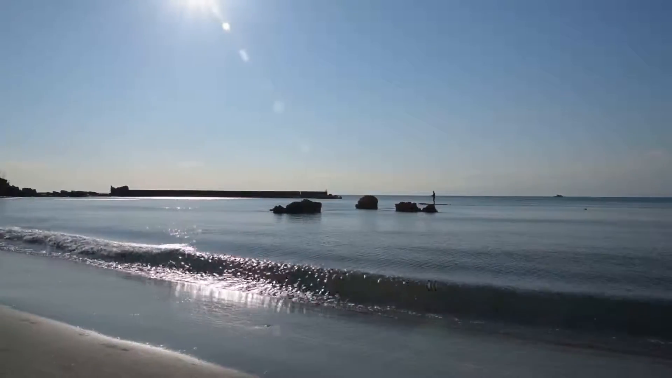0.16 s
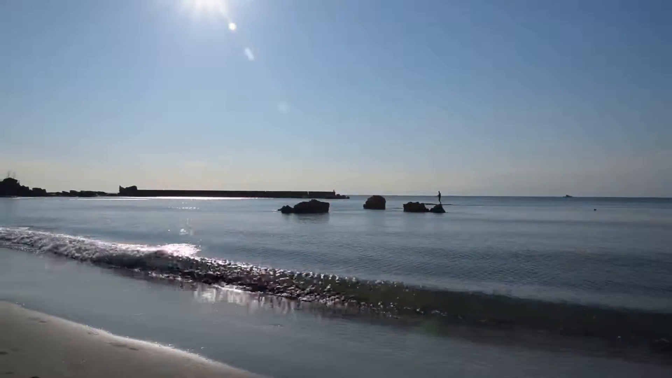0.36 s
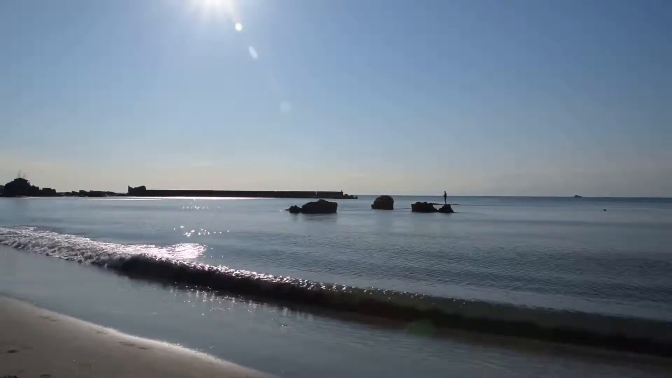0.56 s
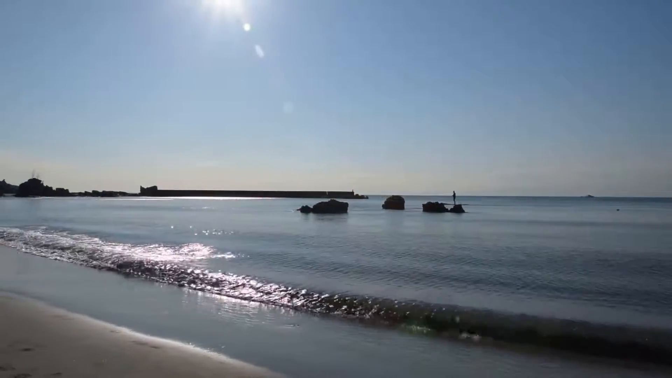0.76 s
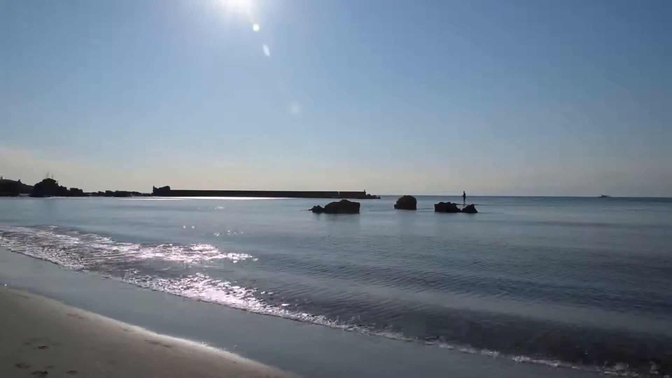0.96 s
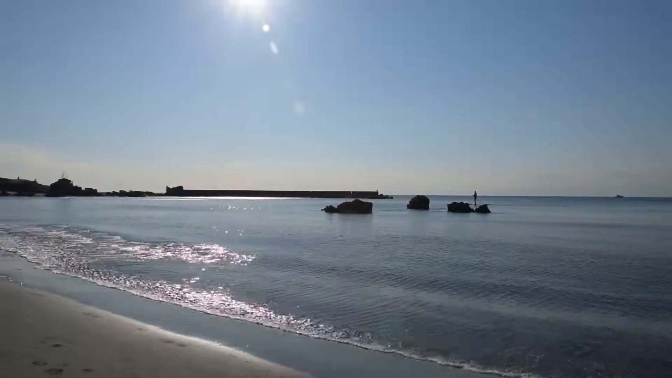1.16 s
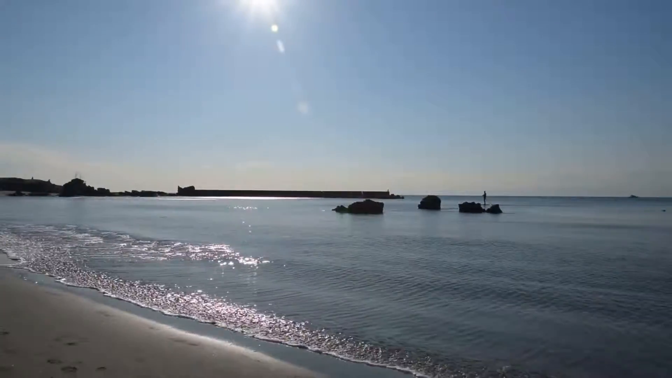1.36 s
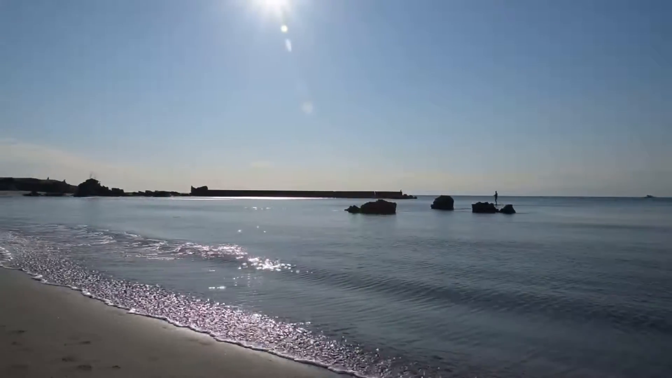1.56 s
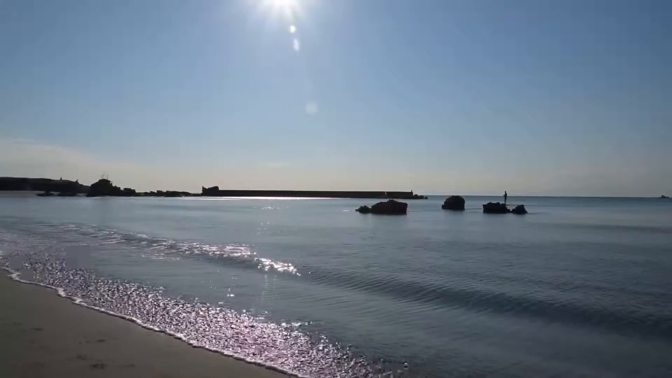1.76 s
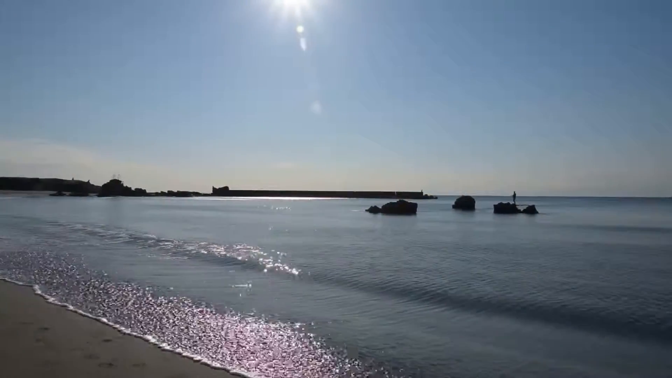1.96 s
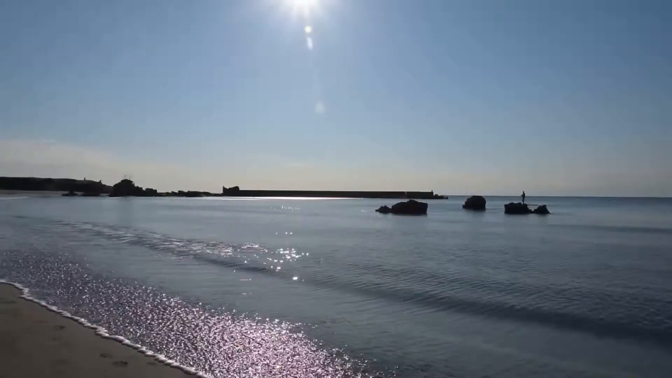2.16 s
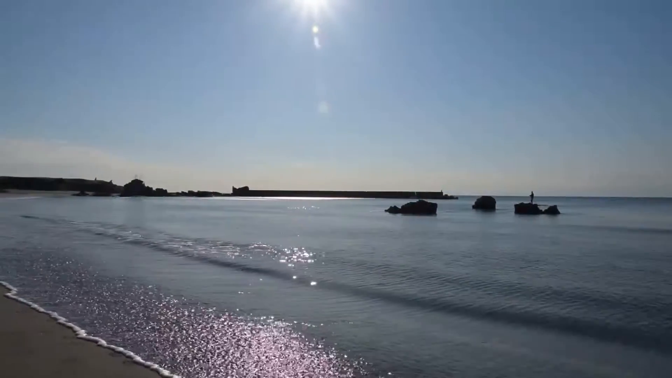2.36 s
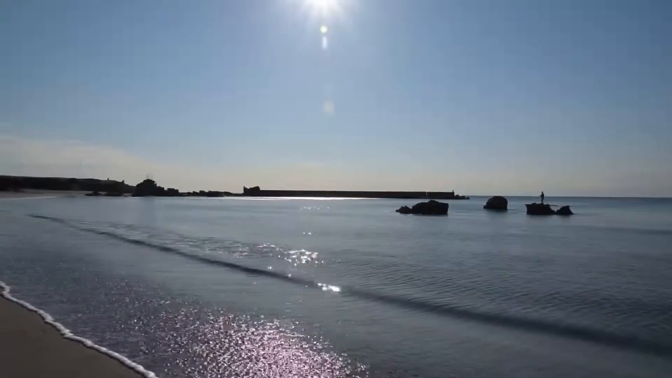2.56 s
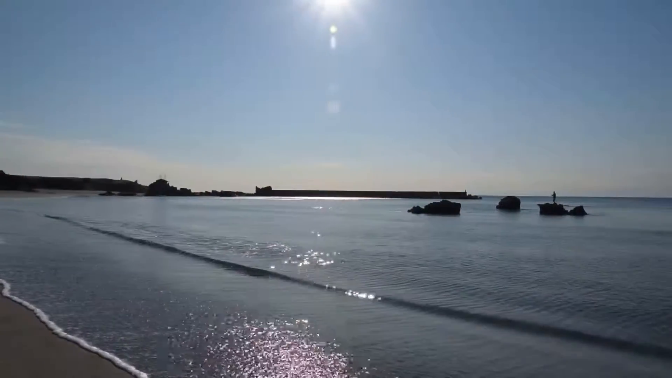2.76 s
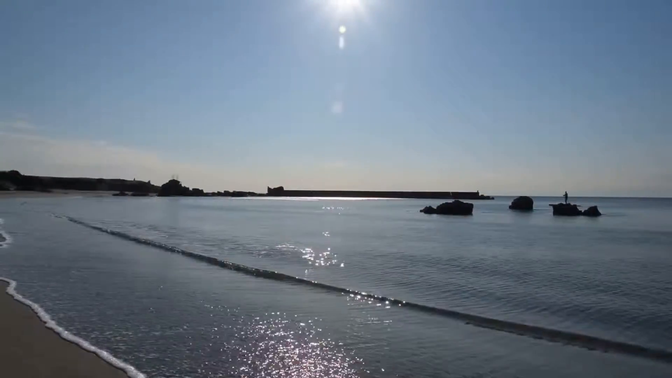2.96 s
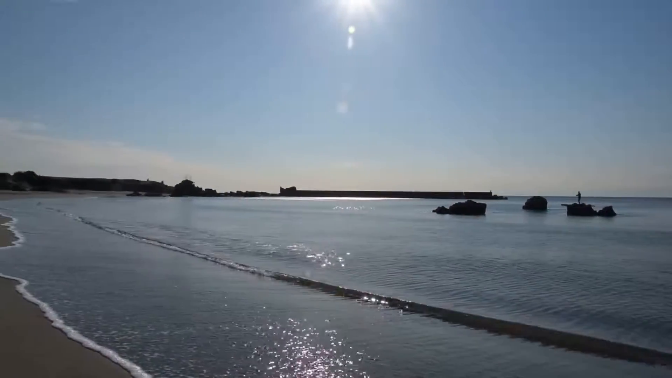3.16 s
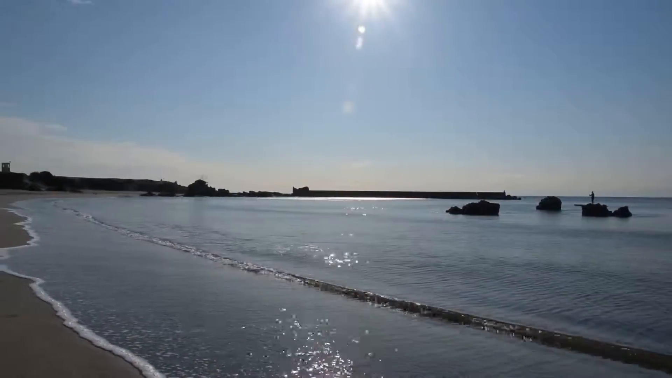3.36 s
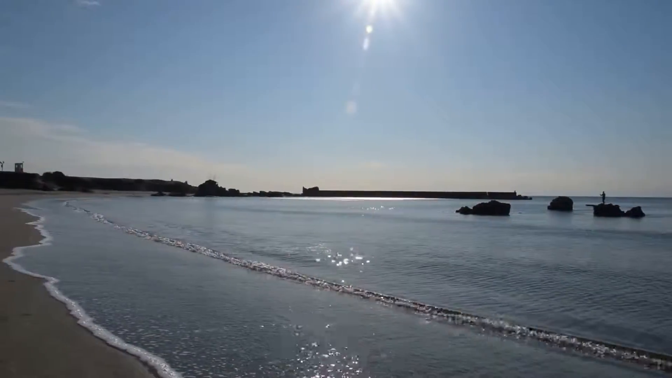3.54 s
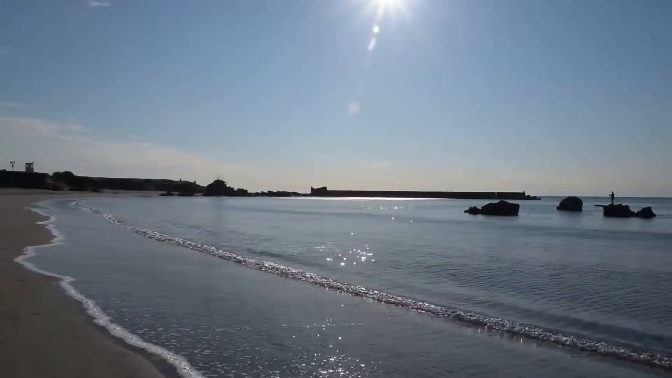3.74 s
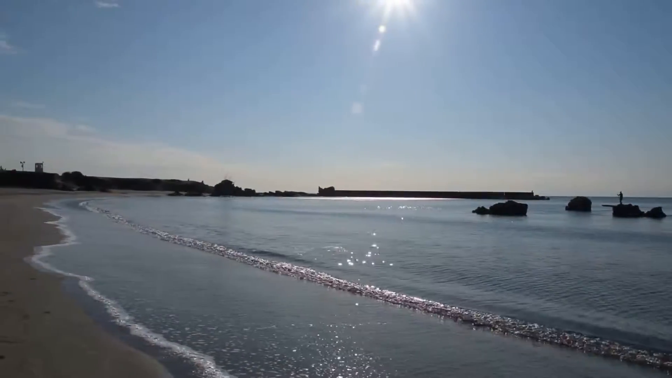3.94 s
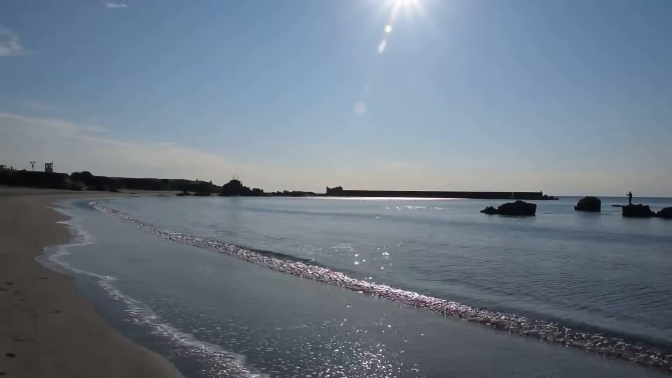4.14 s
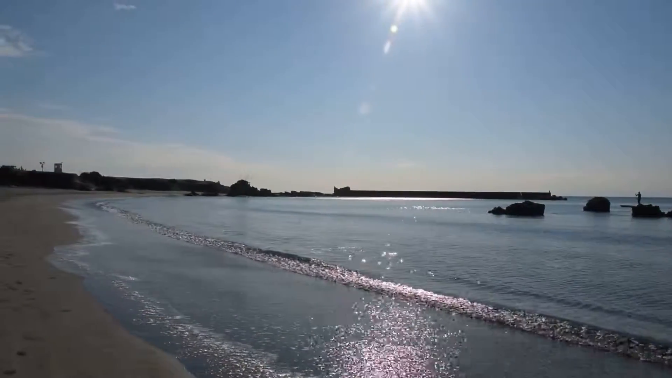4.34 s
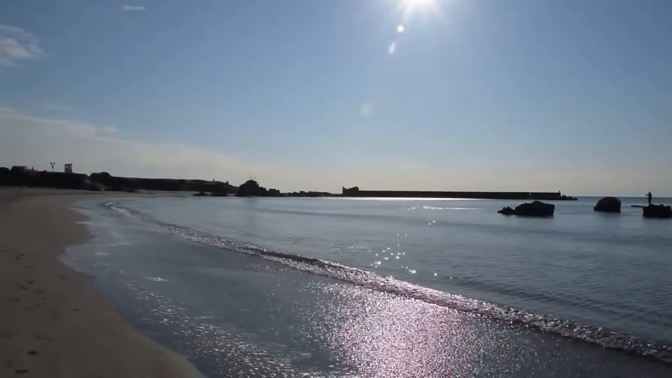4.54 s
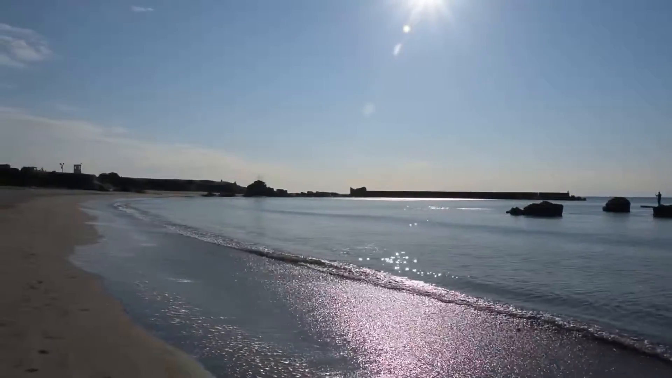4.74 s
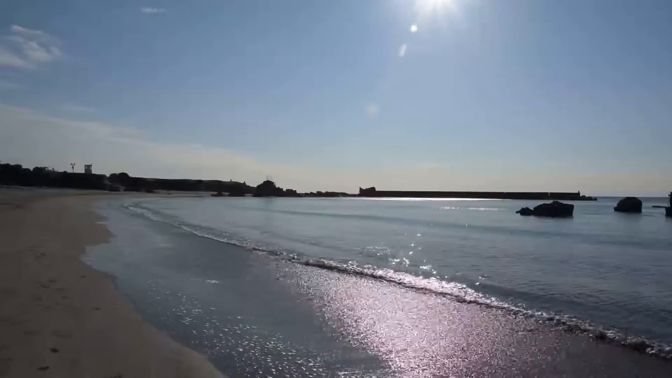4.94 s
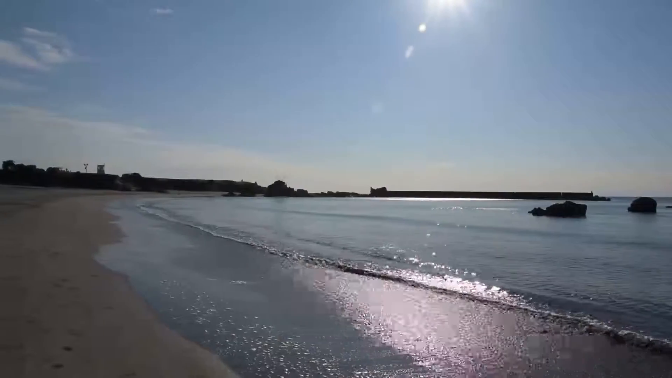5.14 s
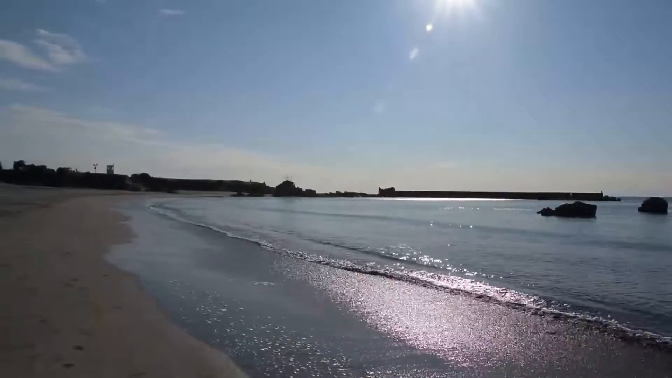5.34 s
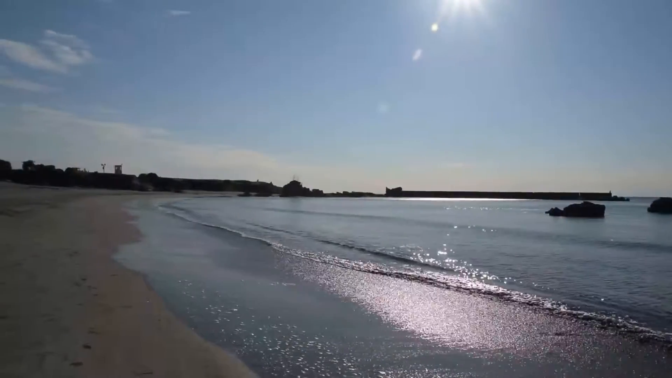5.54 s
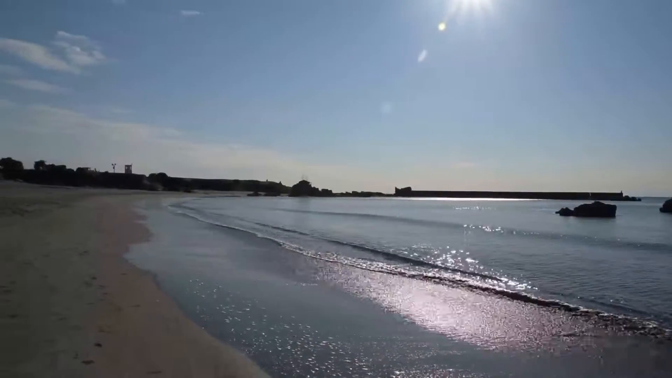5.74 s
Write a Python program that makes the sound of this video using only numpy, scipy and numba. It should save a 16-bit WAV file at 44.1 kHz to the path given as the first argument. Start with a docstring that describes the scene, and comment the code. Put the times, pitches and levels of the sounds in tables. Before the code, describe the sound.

A gentle shore break swells and slaps down once on trapped air, hisses away, then little bubbling wavelets and tiny droplet ticks follow.

```python
"""A sandy beach, where small waves break and wash up, heard by two spaced microphones.
Each breaker is a cloud of ringing bubbles over noise, from big gurgling pockets to fine foam, running along the shore.
The open sea is a smooth far hiss, two low tones waver as a hum, and a light wind is a swelling low rumble.
One wave slaps down on trapped air, heard as short ringing tones; later droplets burst as tiny rings with puffs of noise."""
import sys
import numpy as np
from scipy import signal
from scipy.fft import rfft, irfft, next_fast_len
from scipy.io import wavfile
from scipy.ndimage import uniform_filter1d, map_coordinates
from numba import njit

SR = 44100
rng = np.random.default_rng(int(sys.argv[2]) if len(sys.argv) > 2 else 0)


def transcribe(signal):
    """Save signal, clipped to [-1, 1], as a 16-bit WAV file at the path in sys.argv[1]."""
    frames = np.atleast_2d(signal).T
    limited = np.clip(frames, -1, 1)
    pcm = np.round(limited * 32767).astype(np.int16)
    wavfile.write(sys.argv[1], SR, pcm)


N = 255780

# where the breaker stands, as the delay of the right microphone behind the left: t/s, delay/ms
BEARING = [(0, 0.9), (.8, 0.77), (1.3, 0.37), (2.8, 0.72), (3.3, 0.79), (3.7, 0.68), (4.1, 0.17),
           (4.7, 0.083), (5.2, -0.14), (5.8, -0.48)]
# bubble sizes, biggest first: low f/Hz, high f/Hz, bubbles/(1/s), life/cycles (before a random factor),
# share of bubbles against noise/0-1, patchiness/dB, level/dB, speed of dying/factor, reach of panning/factor, L-R/dB
BUBBLE_SIZES = [(127, 369, 470, 3.65, 0.04, -1.5, 1.2, 1.57, 0.36, 1.5),
                (392.7, 920, 500, 4.8, 0.01, 1, 1.06, 1.82, 0.51, 3.5),
                (847, 1462, 600, 4.94, 0, 2.5, -2, 1.28, 2.02, 3.5),
                (1397, 2685, 700, 5.7, 0.05, 0.5, -1.47, 0.79, 2.05, -0.5),
                (2490, 6230, 900, 3.7, 0.04, 0, 0.34, 0.79, 1.2, -2),
                (4600, 9600, 900, 0.91, 0.11, 2, -0.2, 1.02, 1.82, -2),
                (8700, 10900, 1600, 2, 0.23, 1.5, -0.64, 1.4, 2.03, -2.5)]
# how alike the two microphones hear a sound: f/Hz, likeness/0-1
LIKENESS = [(100, 0.99), (400, 0.97), (1500, 0.19), (4000, 0.033), (15000, 0.055)]


def amp(db):
    """Turns decibels into a gain."""
    return 10 ** (np.asarray(db) / 20)


def unit(x):
    """Scales a sound to an average (RMS) strength of one."""
    return x / np.sqrt(np.mean(x ** 2) + 1e-20)


def along(points, hz):
    """Reads a curve of (f/Hz, value) points, with straight lines on a log frequency axis."""
    f, v = np.transpose(points)
    return np.interp(np.log(hz + 1), np.log(f + 1), v)


def curves(rows):
    """Gives one value per sample for each column after the time."""
    s, *cols = np.transpose(rows)
    return [np.interp(np.arange(N) / SR, s, c) for c in cols]


def sides(pan_db):
    """Gives left and right gains for a level difference: positive is louder on the left."""
    return amp(np.array([pan_db / 2, -pan_db / 2]))


def filtered(x, response):
    """Multiplies the spectrum of a sound by a gain for each frequency."""
    m = next_fast_len(N + SR // 4)
    return irfft(rfft(x, m) * response(np.fft.rfftfreq(m, 1 / SR)), m)[..., :N]


def wobble(rate):
    """Draws a smooth random curve through a given number of random points a second."""
    points = rng.standard_normal(int(N * rate / SR) + 4)
    return map_coordinates(points, [np.arange(N) * rate / SR])


def rush(patchy_db, alike):
    """Makes white stereo noise in patches of random gain; mixing mid and side sets how alike the channels are."""
    z = signal.stft(rng.standard_normal((2, N)), nperseg=512)[2]
    # smooth the random gains over frequency, then over time
    field = uniform_filter1d(rng.standard_normal(z.shape[1:]), 5, 0)
    field = uniform_filter1d(field, 9, 1)
    pair = signal.istft(z * amp(patchy_db * unit(field)), nperseg=512)[1][:, :N]

    def mid_side_gains(hz):
        angle = np.arccos(np.clip(along(alike, hz), -1, 1)) / 2
        return np.array([np.cos(angle), np.sin(angle)])

    mid, side = filtered(pair, mid_side_gains)
    return unit(np.array([mid + side, mid - side]))


def later(pair, ms):
    """Delays the right channel against the left, half on each side."""
    shift, n = ms * SR / 2000, np.arange(N)
    left = map_coordinates(pair[0], [n + shift])
    right = map_coordinates(pair[1], [n - shift])
    return np.array([left, right])


@njit
def ring(rows, swell, n, sr):
    """Adds dying sines whose pitch glides; each swells in over a share of its 60 dB decay time (t60)."""
    out = np.zeros((2, n))
    # columns: t/s, level/dB, f/Hz, t60/s, pitch rise over t60/share, L-R/dB, right later/ms
    for s, db, hz, t60, glide, pan, ms in rows:
        for side in range(2):
            start = (s + (side - .5) * ms / 1000) * sr
            gain = 10 ** ((db + (.5 - side) * pan) / 20)
            for i in range(max(int(start) + 1, 0), min(int(start + t60 * sr), n)):
                age = (i - start) / sr / t60
                turns = hz * t60 * age * (1 + glide * age / 2)
                envelope = 10 ** (-3 * age) * (1 - np.exp(-age / swell))
                out[side, i] += gain * np.sin(2 * np.pi * turns) * envelope
    return out


def bubbles(lo_hz, hi_hz, rate, cycles):
    """Rings a cloud of bubbles of random pitch, level and place; each rises in pitch as it nears the surface."""
    u = rng.random((int(rate * N / SR), 6))
    hz = lo_hz * (hi_hz / lo_hz) ** u[:, 1]
    size_db = 14 * u[:, 2] ** 2  # many faint ones, a few loud
    t60 = 3 * cycles * (.5 + u[:, 3]) / hz
    rise = 0.91 * u[:, 3]  # the more cycles a bubble lives, the more it rises
    pan_db, lag_ms = 12 * (u[:, 4] - .5), 0.87 * (u[:, 5] - .5)
    rows = np.array([u[:, 0] * N / SR, size_db, hz, t60, rise, pan_db, lag_ms])
    return unit(ring(np.ascontiguousarray(rows.T), 0.064, N, SR))


def breaking(lo_hz, hi_hz, size_db, dying, reach, lean_db):
    """Gives one bubble size its strength: every breaker rises, holds and falls as it runs along the shore."""
    # breakers: crest t/s, hold/s, level/dB, rise/(dB/s), fall/(dB/s) (before the speed of dying),
    # brightness/(dB/octave), narrowness/(dB/octave^2), L-R at the crest/dB and run/(L-R dB/s) (both before the reach),
    # plunge (extra level of the biggest bubbles)/dB, foam (extra level of the finest)/dB
    breakers = [(0.0, 0.18, -35, 44, 17, -2.5, 1.38, 3.5, -9.5, -0.5, 3.5),
                (0.56, 0.36, -37.5, 30.5, 26.5, -2, 0.7, 6, -14.5, -2, -2.5),
                (0.78, 0.04, -38, 60, 60, -1.5, -0.5, 2.5, -3, -9, -11),
                (0.864, 0.12, -32.5, 55, 34.5, 1.8, 0.28, 1.3, -3, 0, -2),
                (0.9, 0.042, -40.5, 124, 164, 1.5, -0.5, -2, 0, -13, -11),
                (1.05, 0.15, -43, 39, 154.5, -1.5, 0, 1.5, -1, -8.5, 6.5),
                (1.786, 0.57, -55, 44, 6.5, -0.83, -1.29, 2.2, -1.5, -6.5, -2.5),
                (3.177, 0.2, -53.5, 59, 20, -1, 0, 7.5, -3, 5, -2),
                (3.33, 0.15, -45.5, 110, 60, -4.5, 0.5, 7.5, 7, -5, -9),
                (3.537, 0.074, -51, 66, 30, 1.5, 0.5, 2.5, 1, -11, 1),
                (3.627, 0.14, -49, 147, 80, -10, 2, 6, -1, -17, 0),
                (3.673, 0.043, -38, 33.5, 24.5, -2, 0.36, 1, -15.5, -10, 1.5),
                (3.855, 0.097, -37.5, 63, 54, -2, 0.8, -0.5, 0, -4, 4),
                (4.053, 0.1, -44.5, 55, 46, -1.5, 0.5, 1.5, 7, -0.5, 2.5),
                (4.257, 0.14, -45, 23, 10, -2.1, 2.5, 4, 0, -13.5, 17.5),
                (4.78, 0.1, -44, 60.5, 40, -0.5, 1, 1, -5, -15, 3),
                (5.036, 0.16, -45, 80, 58, -2, 1.5, -1, -5, -11, 0),
                (4.902, 0.21, -37.5, 23, 32.5, 1.5, 1.26, 1, -7, -12.5, 1),
                (5.688, 0.4, -48, 6, 12, -1, 1, -2, -25, -10, 0.5)]
    middle_hz = 1500
    later_s = 0.0047  # smaller bubbles crest later, per octave
    run_s = (-0.39, 1)  # a breaker runs along the shore from before its crest until after it
    t = np.arange(N) / SR
    octave = np.log2(np.sqrt(lo_hz * hi_hz) / middle_hz)
    biggest, finest = lo_hz == BUBBLE_SIZES[0][0], lo_hz == BUBBLE_SIZES[-1][0]
    power = 0
    for s, hold, db, rise, fall, bright, narrow, pan, run, plunge_db, foam_db in breakers:
        age = t - s - later_s * octave
        shape_db = rise * np.minimum(age, 0) - fall * dying * np.maximum(age - hold, 0)
        colour_db = bright * octave - narrow * octave ** 2 + plunge_db * biggest + foam_db * finest
        pan_db = lean_db + reach * (pan + run * np.clip(t - s, *run_s))
        power = power + (amp(db + size_db + colour_db + shape_db) * sides(pan_db)) ** 2
    return np.sqrt(power)


def surf():
    """Sounds each bubble size as single bubbles over the roar of countless others; colour follows the bearing."""
    # colour of a breaker ahead: f/Hz, level/dB
    froth = [(65, -40), (110, -10.5), (201, -8.5), (247, -6.5), (286, -4.5), (383, -4), (617, 0),
             (826, -0.5), (2700, 1.5), (3690, 1.5), (5250, -5), (6460, -9), (8650, -16.5), (11600, -14.5),
             (15800, -15)]
    # colour of a breaker on the left, coloured by the recorder's body: f/Hz, level/dB
    aside_colour = [(65, -38), (110, -9.5), (181, -12), (400, 1.5), (617, -6.5), (936, -3), (1300, -2.5),
                    (1900, -4.5), (2700, -7.5), (3190, -7), (4930, -18), (7960, -18.5), (10200, -28.5),
                    (12300, -21.5), (14800, -25.5), (15800, -21)]
    # side balance of a breaker on the left: f/Hz, L-R/dB
    shade = [(1500, -1.5), (3000, 1.5), (5000, -4), (7000, 3.5), (9500, -6.5), (12000, 8.5), (15000, 12)]
    churn_db, churn_rate = .2, 22  # uneven surging: depth per octave above 400 Hz, random points a second
    bearing = curves(BEARING)[0]
    left = np.clip(bearing / 1.4, 0, 1)  # 0 is ahead, 1 is fully on the left
    total = 0
    for lo, hi, rate, cycles, share, patchy_db, *rule in BUBBLE_SIZES:
        single = np.sqrt(share) * bubbles(lo, hi, rate, cycles)
        cloud = single + np.sqrt(1 - share) * rush(patchy_db, LIKENESS)

        def ahead_gain(hz):
            band = 1 / np.sqrt((1 + (lo / (hz + 1)) ** 8) * (1 + (hz / hi) ** 8))
            return band * amp(along(froth, hz))

        def aside_gain(hz):
            band = 1 / np.sqrt((1 + (lo / (hz + 1)) ** 8) * (1 + (hz / hi) ** 8))
            return band * amp(along(aside_colour, hz)) * sides(along(shade, hz))

        ahead = unit(filtered(cloud, ahead_gain))
        aside = unit(filtered(cloud, aside_gain))
        churn = amp(churn_db * np.log2(hi / 400) * wobble(churn_rate))
        total = total + breaking(lo, hi, *rule) * churn * (left * aside + (1 - left) * ahead)
    return later(total, bearing)


def sea():
    """Makes the far sea a smooth hiss from the right: shaped noise that reaches the right microphone first."""
    # colour of the far sea: f/Hz, level/dB
    sea_colour = [(56, -29), (95, 3), (131, 2.5), (254, -0.5), (398, 0.5), (500, 7), (620, -1.5),
                  (900, -5.5), (1350, -2), (1940, -5.5), (2400, -14.5), (4020, -25), (4870, -28),
                  (12000, -15), (14400, -26), (15200, -55), (15800, -70)]
    # side balance of the far sea: f/Hz, L-R/dB
    sea_side = [(60, 5), (110, -2), (200, -0.5), (380, 2), (700, -4), (1290, -3), (2380, -10), (4400, -3),
                (8120, 5), (15000, -3.5)]
    hiss = filtered(rush(0.18, LIKENESS), lambda hz: amp(along(sea_colour, hz)) * sides(along(sea_side, hz)))
    return amp(-44) * later(unit(hiss), -0.74)


def lows():
    """Adds two sines wavering in pitch and strength to low wind noise, nearly alike in shape on both sides."""
    # tones of the hum: f/Hz, size of the pitch wander/Hz, level against each other/dB
    tones = [(65.9, 4.1, 7), (79, 3.66, 5)]
    # colour of the wind: f/Hz, level/dB
    buffet = [(8.8, -41), (15, -2.5), (59, -1.5), (79, -15), (100, -3.5), (130, -32), (220, -120)]
    # levels over time: t/s, hum level (before its swell)/dB, wind level (before a 6.5 dB lift)/dB, wind L-R/dB
    levels = [(0, -42, -48.5, 29), (.2, -45.5, -58, 15), (.35, -52.5, -51, 8), (.6, -51.5, -54, 9),
              (.75, -50.5, -58, 10), (.87, -43.5, -55, 22), (1.0, -44.5, -62, 18), (1.4, -53.5, -58, 3),
              (1.75, -45, -50.5, -1), (2.15, -50, -57, 4), (2.6, -50, -53.5, 4.5), (3.05, -53.5, -53, 10),
              (3.4, -49.5, -57.5, 5), (4.0, -49, -61, -2), (4.25, -48, -63.5, 1), (4.6, -47.5, -56, 3),
              (4.8, -52, -56, 2), (5.4, -47.5, -57, 0), (5.8, -51, -59, 1.5)]
    hum_db, wind_db, wind_pan = curves(levels)
    hum = 0
    for hz, wander, db in tones:
        strength = amp(db + 2.8 * wobble(21.96))
        turns = np.cumsum(hz + wander * wobble(16)) / SR
        hum = hum + strength * np.sin(2 * np.pi * turns)
    hum_pair = later(unit(hum) * np.ones((2, 1)), np.full(N, 1.0))
    wind = unit(filtered(rush(1.6, [(30, 0.98)]), lambda hz: amp(along(buffet, hz))))
    swell_db = hum_db + 1 * wobble(4.39)  # swells by about 1 dB
    hum_part = amp(swell_db) * sides(0.92)[:, None] * hum_pair
    return hum_part + amp(wind_db + 6.5) * sides(wind_pan) * wind


def pockets():
    """Rings air caught under the falling crest briefly; in many pockets pitch rises as they near the surface."""
    # single air pockets: t/s, level/dB, f/Hz, t60/s, pitch rise over t60/share, L-R/dB
    air = [(.809, -12, 470, .05, 0, 1), (.8268, 1, 1080, .011, 0, 1), (.827, -8, 1900, .007, 0, 1),
           (.830, -8, 660, .025, 0, 2), (.8360, -4, 900, .014, 0, 4), (.8385, -2, 1500, .005, 0, 2),
           (.8428, 3, 730, .011, 0, 7), (.8415, -7, 210, .025, 0, 0), (.8465, -4, 480, .014, 0, 4),
           (.8550, -6, 760, .012, 0, 8), (.8575, -4, 170, .05, .1, 1), (.8620, -3, 330, .010, 0, 5),
           (.8625, -9, 950, .008, 0, 4), (.860, -20, 105, .05, 0, 1), (.8585, -11, 300, .02, 0, 3),
           (.8675, -5, 520, .016, 0, 4), (.8485, -9, 950, .012, 0, 4), (.8675, -8, 900, .012, 0, 3),
           (.873, -10, 260, .02, 0, 2), (.887, -13, 1300, .012, 0, 2), (.912, -17, 430, .04, 0, 2),
           (2.997, -24, 1170, .03, .1, 3), (3.25, -29, 170, .09, .5, -2), (3.285, -28, 200, .07, .5, -2),
           (3.345, -25, 450, .05, .3, 2), (3.47, -27, 480, .05, .3, 3), (3.615, -22, 560, .05, .3, 4),
           (3.65, -24, 620, .06, 0, 4), (3.675, -22, 370, .06, .3, 4), (3.708, -15.5, 990, .025, .2, 8),
           (3.84, -27, 470, .09, .9, -6), (3.885, -26, 270, .08, .3, -3), (3.897, -18.5, 615, .09, .1, -5),
           (3.915, -25, 420, .06, .3, -3), (3.93, -22, 620, .06, .1, -5), (3.955, -24, 520, .07, 0, -3),
           (3.99, -28, 560, .06, 0, -2), (4.07, -26, 290, .1, .1, 0), (4.122, -27, 470, .05, .1, 0),
           (4.2, -26, 670, .04, .1, 2), (4.368, -21, 590, .045, .3, 5), (4.825, -28, 600, .06, .2, 2),
           (4.935, -24, 850, .05, .2, 0), (4.97, -25, 520, .04, .2, 0), (5.035, -21, 460, .05, .2, 0),
           (4.76, -26, 650, .05, .3, 2), (4.855, -26, 1200, .03, .2, 0), (5.042, -24, 1100, .03, .2, 0),
           (5.085, -25, 480, .05, .5, 0), (5.135, -29, 620, .05, .3, 0), (5.172, -28, 750, .04, .3, -2),
           (5.445, -32, 530, .04, .3, 0), (5.566, -27, 470, .04, 0, 0), (5.574, -25, 400, .08, 3, 0),
           (5.61, -31, 450, .05, 1, 0), (5.647, -20.5, 560, .035, .8, 0), (5.677, -31, 660, .03, 0, 0),
           (5.745, -28, 480, .04, .8, 0), (5.755, -25, 600, .04, .3, 0)]
    # a scatter of lesser pockets: span in s, loudest level in dB, top pitch in Hz falling over the span
    slap_s, slap_db, slap_hz = (.822, 0.95), -14.5, (2170, 450)
    # a fainter, shorter ring of equal or higher pitch follows each single pocket and roughens it:
    # greatest delay in t60s, level against the pocket in dB, greatest step up in octaves
    echo_late, echo_db, echo_octaves = .5, -11, .9
    u = rng.random((14, 4))
    hz = slap_hz[0] * (slap_hz[1] / slap_hz[0]) ** u[:, 0] / 2 ** (1.5 * u[:, 1])
    s = slap_s[0] + (slap_s[1] - slap_s[0]) * u[:, 0]
    lesser = np.array([s, slap_db - 8 * u[:, 2], hz, 9 / hz, 0 * s, 6 * u[:, 3]]).T

    v = rng.random((len(air), 3))
    s, db, hz, t60, glide, pan = np.transpose(air)
    follower_s = s + echo_late * t60 * v[:, 0]
    follower_hz = hz * 2 ** (echo_octaves * v[:, 1])
    follower_pan = pan + 8 * (v[:, 2] - .5)
    followers = np.array([follower_s, db + echo_db, follower_hz, .5 * t60, glide, follower_pan]).T

    rows = np.concatenate([air, followers, lesser])
    lag_ms = .28 * np.interp(rows[:, 0], *np.transpose(BEARING))  # a share of the breaker's delay
    return ring(np.column_stack([rows, lag_ms]), .15, N, SR)


def spits():
    """Bursts droplets close by: a tiny bubble rings for a few cycles, with a puff of bright noise."""
    # bursting droplets: t/s, level (before ring and puff offsets)/dB, L-R/dB, f/Hz
    bursts = [(3.1486, -29, 7.5, 8200), (3.31, -29, 3, 12000), (3.355, -35, 3, 12500),
              (3.41, -28, 8, 11500), (3.485, -31, 7.5, 6470), (3.5397, -26, 8, 4160),
              (3.7065, -28, -5, 6500), (3.844, -23, -5, 4430), (4.0705, -22, -2, 3420),
              (4.097, -30, -4.5, 2600), (4.3166, -30, 2.5, 9500), (4.3639, -28, 0.5, 3800),
              (4.4187, -25, 10, 4400), (4.4233, -27, 2.5, 9450), (4.526, -34, 5, 3380),
              (4.727, -23, 4.5, 2740), (4.937, -24, -2, 10000), (5.106, -28, 0, 10500),
              (5.3012, -35.5, -5, 3780), (5.4655, -33.5, 0, 8770), (5.626, -26, -6, 3610),
              (5.6559, -23.5, -5.5, 3270), (5.7881, -32, -14, 3500)]
    spray_hz, spray_s, spray_db = 4200, (3.2, 5.8), -32  # fainter ones: middle pitch, span, middle level
    puff_db = 2  # per octave: the smaller the droplet, the more puff against ring
    u = rng.random((18, 4))
    s = spray_s[0] + (spray_s[1] - spray_s[0]) * u[:, 0]
    u = u - .5
    faint = np.array([s, spray_db + 8 * u[:, 1], 12 * u[:, 2], spray_hz * 2 ** (1.5 * u[:, 3])]).T
    drops = np.concatenate([bursts, faint])
    rows = np.array([(s, db + 3.5, hz, 14 / hz, .3, pan, pan / 20) for s, db, pan, hz in drops])

    puffs, t = np.zeros((2, N + SR)), np.arange(400) / SR
    for s, db, pan, hz in drops:
        level_db = db - 6.5 + puff_db * np.log2(hz / 8000) - 60 * t / 0.0051  # dies by 60 dB in 5.1 ms
        puff = sides(pan)[:, None] * amp(level_db) * rng.standard_normal((2, len(t)))
        start = round(s * SR)
        puffs[:, start:start + len(t)] += puff
    bright = lambda hz: 1 / (1 + (4000 / (hz + 1)) ** 4) / (1 + (hz / 13000) ** 6)
    return ring(rows, 0.033, N, SR) + filtered(puffs[:, :N], bright)


def scene():
    """Adds all the sounds of the beach."""
    return surf() + sea() + lows() + pockets() + spits()


def record(dry):
    """Colours each microphone's channel by its own treble dips and peaks and keeps nothing above a band limit."""
    # treble of each microphone: f/Hz, left level/dB, right level/dB
    ports = [(2980, -1, -1), (4220, 0.5, 1), (4950, -5, 0), (5860, -1.5, 1), (7060, 1, 2), (8440, 4, -8.5),
             (9300, -0.5, 1), (10200, 1, 0.5), (11600, 1, 1), (13000, 2, 1), (14300, 7.5, 2),
             (15800, 0, -8)]
    top_hz = 15800
    hz_at, *gains_db = np.transpose(ports)
    return filtered(dry, lambda hz: amp([np.interp(hz, hz_at, db) for db in gains_db]) * (hz < top_hz))


dry = scene()
out = record(dry)
transcribe(out)
```